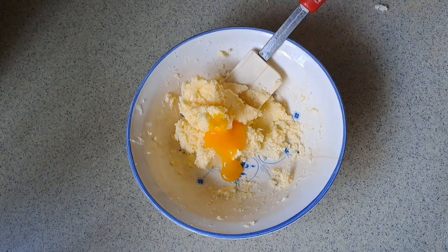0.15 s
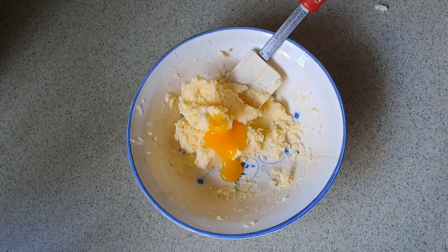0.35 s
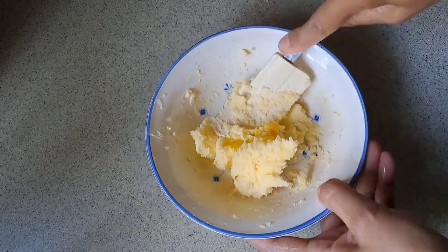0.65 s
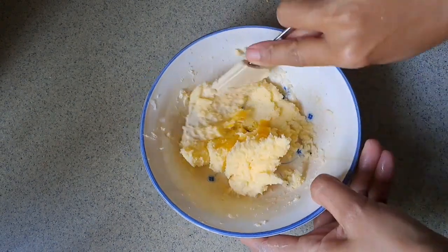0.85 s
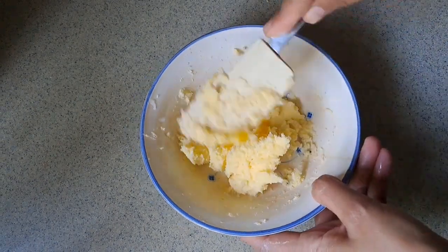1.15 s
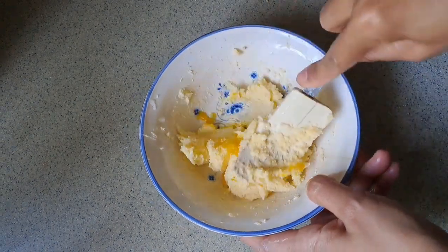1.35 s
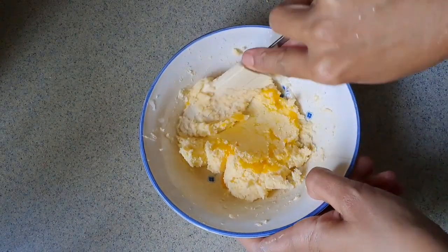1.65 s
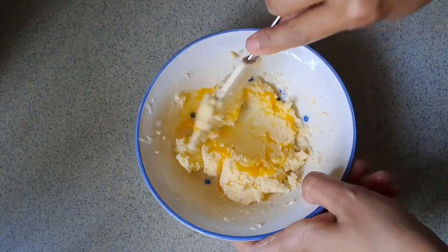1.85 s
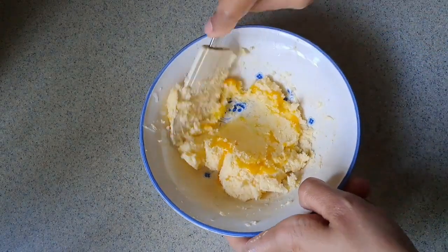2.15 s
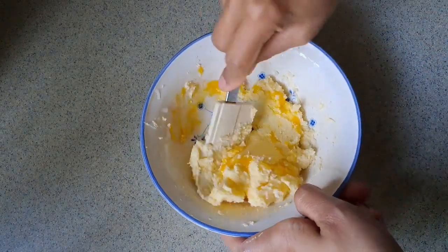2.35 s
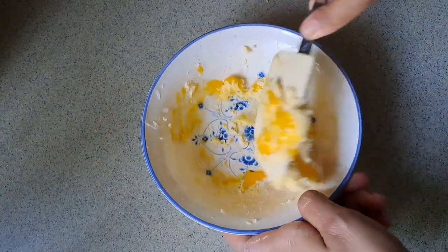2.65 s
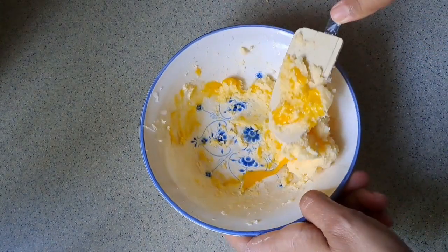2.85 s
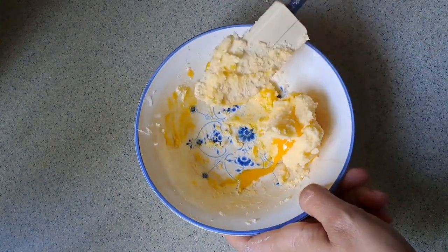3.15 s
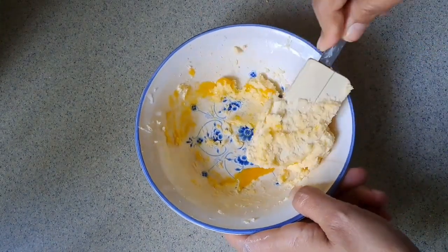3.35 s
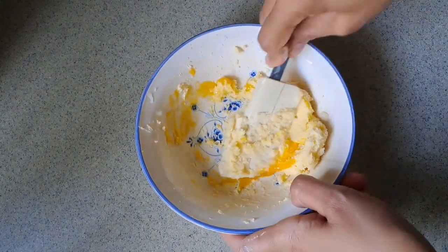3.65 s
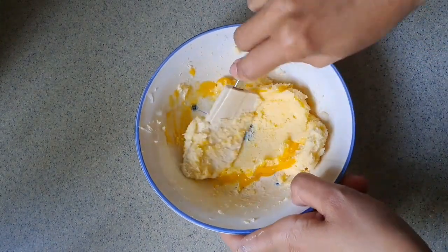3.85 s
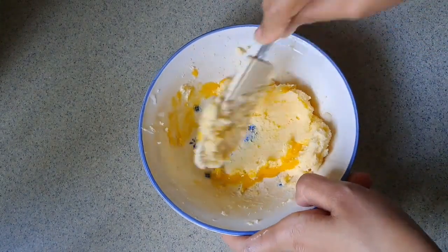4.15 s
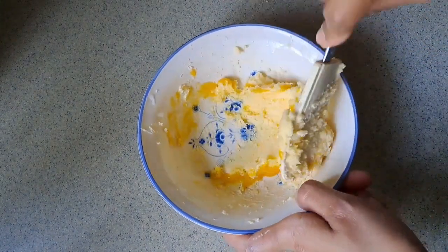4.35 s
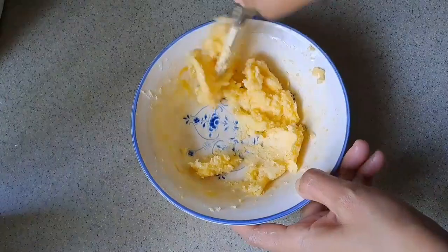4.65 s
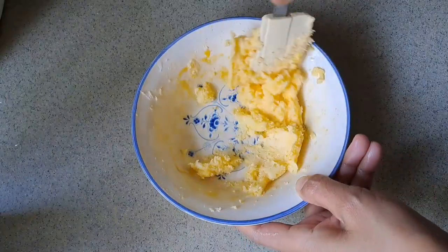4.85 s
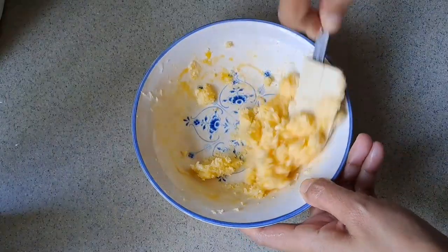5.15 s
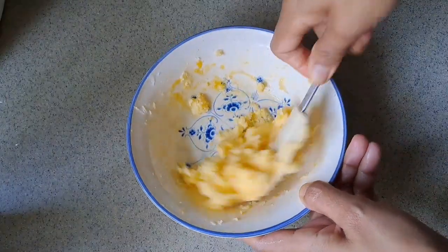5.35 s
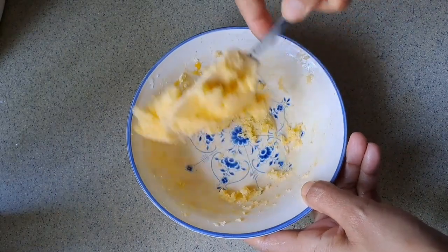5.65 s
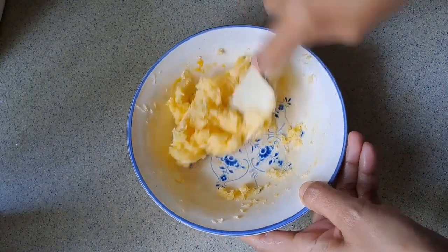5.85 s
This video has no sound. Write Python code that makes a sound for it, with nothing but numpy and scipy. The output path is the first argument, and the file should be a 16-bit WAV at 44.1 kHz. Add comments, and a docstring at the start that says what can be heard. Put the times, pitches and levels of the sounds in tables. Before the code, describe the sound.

A rubber spatula squelches through soft butter and scrapes a ceramic bowl, which knocks irregularly against a kitchen worktop.

```python
"""Creaming butter in a ceramic bowl

A small kitchen, stereo microphone close to a bowl held on the worktop. A rubber spatula works soft
butter and egg yolk: sticky films tear, air pockets pop, and the blade sticks and slips on the glaze.
The bowl rocks and knocks, ringing with the worktop; the walls answer over the low rumble of the hands."""
import sys
import numpy as np
from scipy import signal
from scipy.fft import rfft, irfft, next_fast_len
from scipy.io import wavfile
from scipy.ndimage import uniform_filter1d, map_coordinates

SR = 44100
rng = np.random.default_rng(int(sys.argv[2]) if len(sys.argv) > 2 else 0)


def to_wav(s):
    """Save 16-bit WAV."""
    ch = np.atleast_2d(s).T  # columns
    pcm = np.round(np.clip(ch, -1, 1) * 32767)  # PCM
    wavfile.write(sys.argv[1], SR, pcm.astype(np.int16))


N = 264159

# strokes of the spatula: start t/s, swell/s, ease/s, shear level/dB, rub level/dB, push level/dB,
# blade angle (0 flat face, 1 thin edge), top-octave fizz/dB
SPATULA_STROKES = [(0.03, 0.11, 0.39, -75, -66, -71, 0.83, 9),
                   (0.576, 0.013, 0.043, -47.5, -53.5, -36, 0.44, 0.5),
                   (0.634, 0.029, 0.057, -58, -48, -49, 0.41, -3),
                   (0.795, 0.036, 0.089, -55, -46.5, -48, 0.079, 10),
                   (0.87, 0.071, 0.12, -51.5, -54.5, -51, 0.9, 0.5),
                   (1.0, 0.068, 0.031, -55.5, -53, -60, 0.67, 7),
                   (1.308, 0.0039, 0.092, -57, -70, -60, .3, 6.5),
                   (1.447, 0.12, 0.15, -51, -59, -52.5, 0.27, 3.5),
                   (1.656, 0.042, 0.24, -51, -49.5, -47.5, 0.88, 7.5),
                   (2.06, 0.097, 0.028, -78, -51.5, -50, 0.17, 0),
                   (2.165, 0.048, 0.045, -51, -53, -53, 0.87, 5),
                   (2.25, 0.066, 0.16, -49.5, -51.5, -47.5, 0.83, 3.5),
                   (2.58, 0.32, 0.29, -60, -64, -52, 0.23, 6.5),
                   (2.996, 0.076, .055, -48, -51, -48, 0.51, 4),
                   (3.369, 0.0097, 0.29, -55, -59, -55, 0.6, -8),
                   (3.646, 0.021, 0.22, -47.5, -58, -55.5, 0.51, 2.5),
                   (3.745, 0.033, 0.097, -49.5, -56.5, -50, 0.42, 3),
                   (3.851, 0.18, 0.015, -44.5, -49, -59, 0.97, 4.5),
                   (4.488, .042, .004, -51, -63, -55, 0.48, 2.5),
                   (4.722, 0.078, 0.091, -52, -49, -39.5, .5, 2.5),
                   (4.92, 0.057, 0.13, -47, -57, -45.5, .5, -4.5),
                   (5.09, 0.042, 0.22, -47, -53, -57, 1, -4), (5.343, 0.035, 0.11, -46, -45, -43, 0.41, -1),
                   (5.585, 0.01, 0.11, -64.5, -63.5, -54.5, .5, 11.5),
                   (5.893, 0.014, 0.053, -46, -48, -47, 0.5, 1), (5.97, .02, .05, -41, -52, -51, 0.89, 2)]
SHEAR, RUB, PUSH, BLADE_ANGLE, FIZZ = range(3, 8)


def amp(db):
    """Decibels to gain."""
    return 10 ** (np.asarray(db) / 20)


def unit(x):
    """Scale to rms 1."""
    return x / np.sqrt(np.mean(x ** 2) + 1e-20)


def fade(t, t60):
    """Exponential decay, 60 dB in t60 seconds."""
    return np.exp(-np.log(1000) * t / t60)


def along(points, hz):
    """Read (f/Hz, value) points on a log frequency axis."""
    f, values = np.transpose(points)
    return np.interp(np.log(hz + 1), np.log(f + 1), values)


def wobble(rate):
    """A smooth random curve, rate knots a second."""
    return map_coordinates(rng.standard_normal(int(N * rate / SR) + 4), [np.arange(N) * rate / SR])


def filtered(x, response):
    """Filter x by a gain given as a function of frequency."""
    n = x.shape[-1]
    size = next_fast_len(n + 4096)
    return irfft(rfft(x, size) * response(np.fft.rfftfreq(size, 1 / SR)), size)[..., :n]


def spread(pair, colour_db):
    """Two unrelated signals become a coloured stereo pair of rms 1, alike in the bass."""
    # likeness of left and right at the microphone: f/Hz, correlation
    likeness = [(25, 0.83), (60, 1), (120, 0.9), (300, 0.96), (600, 0.015), (1300, 0), (3000, 0),
                (12000, 0)]

    def mid_side_gains(hz):
        angle = np.arccos(np.clip(along(likeness, hz), -1, 1)) / 2
        return amp(colour_db(hz)) * [np.cos(angle), np.sin(angle)]

    mid, side = filtered(pair, mid_side_gains)
    return unit(np.array([mid + side, mid - side]))


def noise(spectrum, samples=N):
    """Steady stereo noise of rms 1."""
    return spread(rng.standard_normal((2, samples)), lambda hz: along(spectrum, hz))


def crackle(rate, scatter_db):
    """Tiny impulses of uneven size at random times, rate a second; rms 1."""
    fires = rng.random(N) < rate / SR
    size = amp(scatter_db * np.clip(rng.standard_normal(N), -2, 2))
    return unit(fires * size * rng.standard_normal((2, N)) / np.sqrt(rate))


def add(track, start_s, sound):
    """Mix a sound into the track at start_s."""
    i = max(round(start_s * SR), 0)
    part = sound[:, :max(N - i, 0)]
    track[:, i:i + part.shape[1]] += part


def effort(column, grip_s=0.04):
    """Level in dB from one column of the strokes: each grips, swells, eases off and lets go."""
    t, level_db = np.arange(N) / SR, np.full(N, -120.)
    for stroke in SPATULA_STROKES:
        start, swell, ease = stroke[:3]
        release = 0.026 + 0.57 * ease
        times = start - grip_s + np.cumsum([0, grip_s, swell, ease, release])
        shape_db = np.interp(t, times, [-50, -7.5, 0, -9.5, -50])
        level_db = np.maximum(level_db, stroke[column] + shape_db)
    return level_db


def glide(column):
    """One column of the strokes, gliding from the peak of each to the next."""
    columns = np.transpose(SPATULA_STROKES)
    peak_s = columns[0] + columns[1]
    return np.interp(np.arange(N) / SR, peak_s, columns[column])


def room_tone(level_db=-62.5):
    """The still air of the kitchen, a faint steady hush."""
    # colour of the air: f/Hz, density level/dB
    air_spectrum = [(88, -44), (150, -32), (296, -17.5), (436, -1.5), (530, -3.5), (912, -6), (1660, -9.5),
                    (3550, -20), (6860, -17), (13500, -47), (15500, -45)]
    return amp(level_db) * noise(air_spectrum)


def kitchen_walls(sound, delay_s=0.0048):
    """The nearby walls answer; each frequency dies at its own speed."""
    # reverberation time: f/Hz, t60/s
    decay_times = [(120, 0.34), (500, 0.28), (1500, .29), (5000, 0.31), (14000, 0.17)]
    hz, t, bands = signal.stft(rng.standard_normal((2, SR // 2)), SR, nperseg=256)
    tail = signal.istft(bands * fade(t, along(decay_times, hz)[:, None]), SR, nperseg=256)[1]
    tail = spread(tail, np.zeros_like)
    tail = np.pad(tail / np.linalg.norm(tail[0]), ((0, 0), (round(delay_s * SR), 0)))
    return signal.fftconvolve(sound, tail, axes=1)[:, :N]


def handling(rub_db, hold_db=-56, rest_db=-61):
    """The hands make the worktop rumble, more as they push; the blade's drag makes the bowl drone."""
    # worktop rumble: f/Hz, density level/dB
    rumble_spectrum = [(12, -43), (20, 1), (27, -23), (54, -4), (70, 2.5), (119, -9.5), (141, -19.5),
                       (167, -24.5), (190, -22), (250, -58), (420, -120)]
    # bowl drone: f/Hz, density level/dB
    drone_spectrum = [(120, -13), (180, -5.5), (235, -3.5), (305, 2), (400, -9), (550, -2), (750, -6.5),
                      (1100, -13), (2000, -29)]
    push = uniform_filter1d(amp(effort(PUSH) + 1), size=SR // 20)
    hold = amp(hold_db + 2 * wobble(6.3))
    lumps = amp(2 * wobble(28))
    drag = np.hypot(amp(rest_db), amp(rub_db - 4)) * lumps
    return noise(rumble_spectrum) * np.hypot(hold, push) + noise(drone_spectrum) * drag


def squeak(start_s=0.915, length_s=0.05, from_hz=2800, to_hz=3420, level_db=-67):
    """A brief, unsteady, rising squeak of rubber on bare glaze."""
    progress = np.clip((np.arange(N) / SR - start_s) / length_s, 0, 1)
    hz = (from_hz + (to_hz - from_hz) * progress) * (1 + 0.022 * wobble(400))
    return amp(level_db) * np.sin(np.pi * progress) * np.sin(2 * np.pi * np.cumsum(hz) / SR)


def shudder(start_s=0.8025, period_s=0.0098, thump_hz=270, level_db=-40):
    """The flat blade sticks and slips five times in a row; each slip thumps the bowl."""
    out, t = np.zeros((2, N)), np.arange(SR // 20) / SR
    thump = amp(level_db) * np.sin(2 * np.pi * thump_hz * t) * fade(t, t60=0.0093)
    for slip in range(5):
        add(out, start_s + slip * period_s, thump[None])
    return out


def rubbing(rub_db, gain_db=-1.5, face_db=2, judder_db=0.5):
    """The rubber blade sticks and slips over the glaze, higher in pitch on its edge than on its face."""
    # rub of the flat face: f/Hz, density level/dB
    face_spectrum = [(700, -26), (1100, -16), (1270, 0), (1400, -8), (1570, 0), (1800, -9), (2400, -17),
                     (4000, -32)]
    # rub of the thin edge: f/Hz, density level/dB
    edge_spectrum = [(900, -16), (1700, -3), (2300, -3.5), (2800, -4), (3300, -4.5), (4300, -5),
                     (6000, -13), (9000, -27)]

    def slips(spectrum):
        friction = crackle(rate=600, scatter_db=4) + rng.standard_normal((2, N)) / 2
        return spread(friction, lambda hz: along(spectrum, hz))

    edge = np.clip(glide(BLADE_ANGLE), 0.01, 0.99)
    rub = amp(face_db) * (1 - edge) * slips(face_spectrum) + edge * slips(edge_spectrum)
    return rub * amp(gain_db + rub_db - judder_db * wobble(42))


def squelch(shear_db, gain_db=-1, clump_db=1.9, split_hz=9000):
    """Sticky films tear in tiny ticks, denser as the blade shears faster; coarse and fine clump apart."""
    # tearing butter: f/Hz, density level/dB
    tear_spectrum = [(1500, -26), (2500, -5.5), (4000, 0), (5500, 0), (7000, 3.5), (9000, -2.5), (12000, 0),
                     (15500, 0.5)]
    speed = amp((shear_db - shear_db.max()) / 2)
    ticks = crackle(rate=3000 * speed + 100, scatter_db=3.5)
    hiss = amp(-3) * rng.standard_normal((2, N))
    tearing = spread(ticks + hiss, lambda hz: along(tear_spectrum, hz))
    coarse = filtered(tearing, lambda hz: 1 / (1 + (hz / split_hz) ** 6))
    fine = tearing - coarse
    coarse_gain = amp(clump_db * wobble(80))
    fine_gain = amp(glide(FIZZ) + clump_db * wobble(80))
    return amp(gain_db + shear_db) * (coarse * coarse_gain + fine * fine_gain)


def pops(shear_db, gain_db=2.5, small_per_s=24, small_hz=8600, log_width=0.26):
    """Air pockets open with a short, broad snap; small ones burst at random, louder with the shear."""
    # the largest air pockets in the butter, and at 4.552 s the blade peeling off the bowl: t/s, level/dB, f/Hz
    large_pockets = [(0.9844, -46, 8000), (1.0474, -42, 10500), (1.3087, -49, 10500), (1.4902, -47, 13000),
                     (1.5307, -46.5, 7200), (1.6779, -43, 12600), (1.7373, -38.5, 7400),
                     (1.807, -37.5, 6940), (2.26, -36, 1900), (2.407, -46, 11400), (2.4833, -36.5, 6200),
                     (3.395, -44.5, 8550), (3.683, -38.5, 7440), (3.8383, -40, 13300), (4.552, -47, 8950),
                     (5.0008, -39, 7000), (5.125, -39.5, 7700), (5.183, -42.5, 4270),
                     (5.2606, -39.5, 12000), (5.293, -44.5, 10600)]
    out, t = np.zeros((2, N)), np.arange(SR // 40) / SR
    onsets = np.flatnonzero(rng.random(N) < small_per_s / SR)
    small_pockets = [(i / SR, shear_db[i] - 2.5 + 2 * size, small_hz * np.exp(0.3 * pitch))
                     for i, (size, pitch) in zip(onsets, rng.standard_normal((len(onsets), 2)))]
    for start_s, db, hz in large_pockets + small_pockets:
        band_db = lambda f: -10 * np.log10(1 + (np.log((f + 1) / hz) / log_width) ** 4)
        snap = spread(rng.standard_normal((2, len(t))), band_db)
        add(out, start_s, amp(db + gain_db) * snap * fade(t, t60=0.015))
    return out


def slaps():
    """The buttery blade slaps the bowl an instant before the hardest knocks."""
    # wet slaps: t/s, level/dB
    hits = [(4.7234, -28.5), (5.3441, -29.5)]
    # colour of a slap: f/Hz, density level/dB
    slap_spectrum = [(150, 3), (500, 0), (1300, -6), (2500, -20), (4500, -34), (6700, -3.5), (8500, -39),
                     (15000, -24)]
    out, t = np.zeros((2, N)), np.arange(SR // 20) / SR
    for start_s, db in hits:
        add(out, start_s, amp(db) * noise(slap_spectrum, len(t)) * fade(t, t60=0.037))
    return out


def knocks(ring_db=-3, damping=1.19, hard_db=-33.5, rock_s=0.00413, rock_db=-8):
    """The bowl clacks down, rocks twice and rings with the worktop, duller when butter cushions it."""
    # blows on the worktop: t/s, level/dB, then relative to it thud/dB, boom/dB, body/dB
    blows = [(1.151, -54.5, 14, 9, 12.5), (1.433, -55, 3, 10, 13.5), (1.55, -52.5, 18.5, 18.5, 27),
             (1.7397, -49, 2, 5.5, 8), (2.1507, -27, -7, 0.5, 4.5), (2.534, -39.5, 3, -0.5, 8.5),
             (3.0173, -39, -1, -9, 4), (3.1232, -43.5, 5, 1, 11.5), (3.3835, -40.5, 7, -3, 10.5),
             (3.4114, -45.5, 10, 2, 16), (3.619, -49.5, 17, 13.5, 10), (3.77, -52, 8, 8.5, 16.5),
             (4.037, -42, 6, -5, 7), (4.433, -61, 21.5, 13, 24), (4.5439, -56, 9.5, 0, 20),
             (4.726, -23, 6, -4, 8), (5.3469, -19, -6.5, 1, -5.5)]
    # modes of bowl and worktop together: f/Hz, level/dB, t60/s before the extra damping
    modes = [(110, -8.5, .3), (230, -4, .19), (306, -1, .15), (335, -5, .1), (362, -7, .09),
             (470, -11, .08), (504, -11, .13), (558, -8, .09), (590, -10, .13), (660, -13, .09),
             (790, -15, .07), (958, -11, .13), (1056, -15, .11), (1125, -9, .09), (1158, -4, .12),
             (1192, -6, .12), (1257, -10, .12), (1348, -3.5, .11), (1507, -13, .12), (1766, -17, .06),
             (2105, -26, .07)]
    # dense, quickly damped ringing under the modes: f/Hz, density level/dB
    clatter_spectrum = [(50, -53), (130, 3.5), (250, -15.5), (330, -35.5), (430, -0.5), (560, -8.5),
                        (800, 2.5), (1250, -14.5), (1700, -0.5), (2400, -3.5), (3500, -7), (6000, -20.5),
                        (10000, -23.5), (16000, -30.5)]
    # contact of the bowl's foot: f/Hz, rise/s, level/dB over the blow
    foot_contact = (1230, .0007, 11)
    clack_hz, rise_s, clack_db = foot_contact
    hz, mode_db, t60 = np.transpose(modes)
    out, t = np.zeros((2, N)), np.arange(SR // 2) / SR
    sides = np.array([[1], [-1]])  # left and right of the microphone
    build_up = 1 - np.exp(-t * hz[:, None])  # a mode takes about a cycle to get going
    swing = fade(t * damping, t60[:, None]) * build_up * np.exp(2j * np.pi * hz[:, None] * t)
    clatter_envelope = fade(t, t60=0.11) * (1 - np.exp(-t / 0.00021))
    clack_envelope = t / rise_s * np.exp(1 - t / rise_s)
    for start_s, db, thud_db, boom_db, body_db in blows:
        hollow_db = 0.74 + 0.45 * body_db
        crack_db = -14 + 0.83 * max(db - hard_db, 0)  # hard blows crack brighter
        colour = [(120, thud_db), (230, boom_db), (310, body_db), (580, hollow_db),
                  (950, 0), (1500, 0), (2800, crack_db)]
        drive = amp(along(colour, hz))
        # each mode reaches the two sides with its own phase, further apart in the treble
        phase = rng.uniform(0, 2 * np.pi, len(hz))
        phase = phase + sides * rng.standard_normal(len(hz)) * np.minimum(hz / 800, 2)
        ring = ((drive * np.exp(1j * phase)) @ swing).imag
        clatter = spread(rng.standard_normal((2, len(t))),
                         lambda f: along(clatter_spectrum, f) + along(colour, f))
        clatter *= np.sqrt(np.mean(drive ** 2)) * clatter_envelope
        add(out, start_s, amp(db + ring_db) * (ring + clatter))
        for contact in range(3):
            side_phase = sides * (1 + contact) * rng.uniform(0, 1)
            contact_hz = clack_hz * rng.uniform(1.0, 1.004)
            clack = np.sin(2 * np.pi * contact_hz * t + side_phase) * clack_envelope
            contact_s = start_s + contact * rock_s * rng.uniform(1.0, 1.102)
            add(out, contact_s, amp(db + clack_db + contact * rock_db + sides) * clack)
    return out


def scene(bowl_room_db=-10, butter_room_db=-7):
    """Bowl and butter close up, the kitchen behind them."""
    shear_db, rub_db = effort(SHEAR), effort(RUB)
    bowl = knocks() + slaps() + shudder()
    butter = squelch(shear_db) + rubbing(rub_db) + squeak() + pops(shear_db)
    room = kitchen_walls(amp(bowl_room_db) * bowl + amp(butter_room_db) * butter)
    return bowl + butter + room + handling(rub_db) + room_tone()


def record(dry):
    """The recorder keeps nothing above its band limit."""
    top_hz = 15750
    return filtered(dry, lambda hz: 1 / np.sqrt(1 + (hz / top_hz) ** 200))


dry = scene()
out = record(dry)
to_wav(out)
```